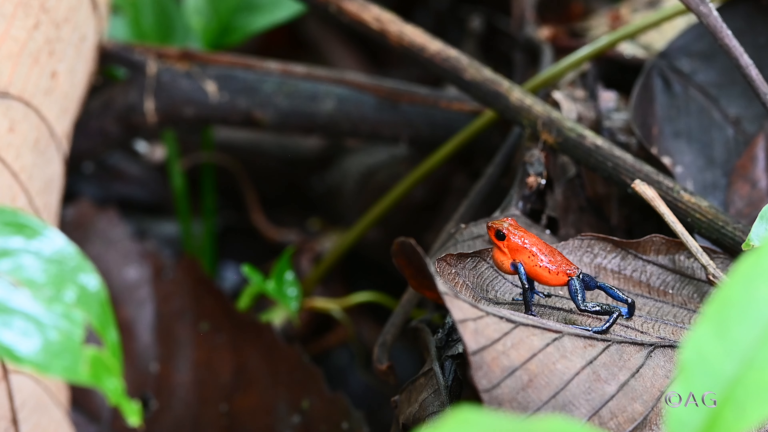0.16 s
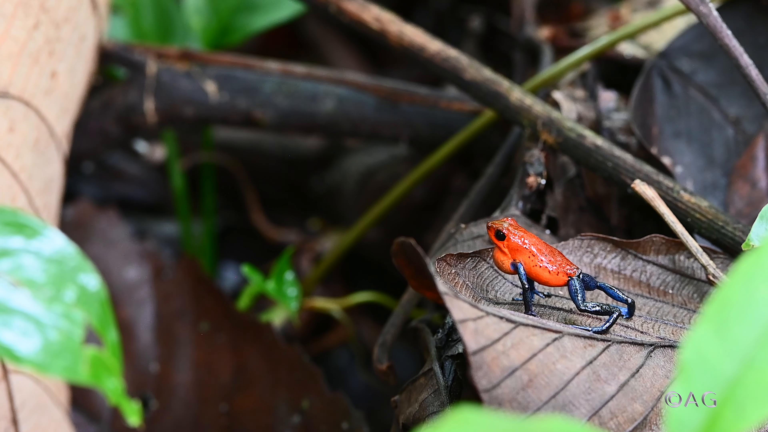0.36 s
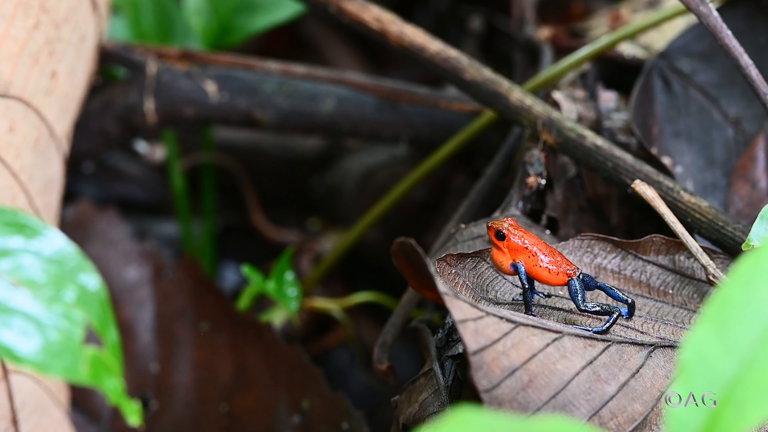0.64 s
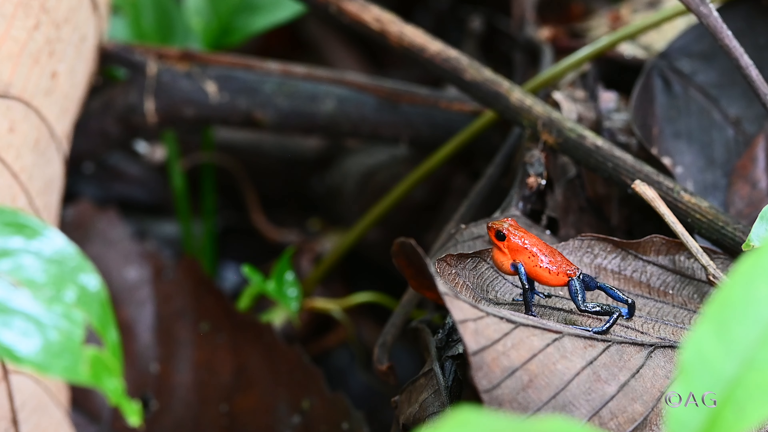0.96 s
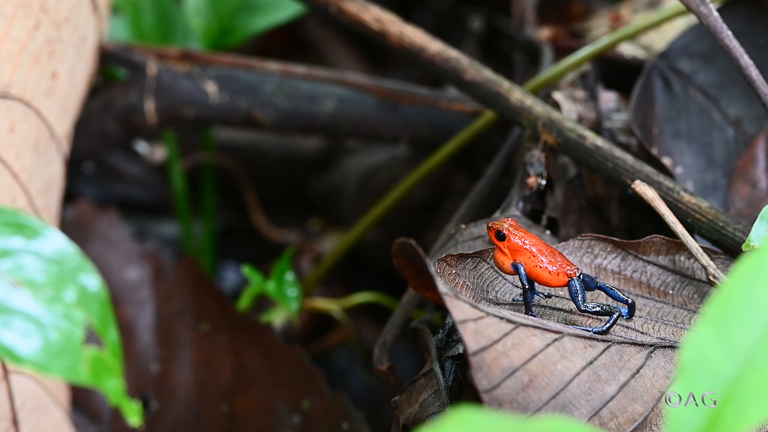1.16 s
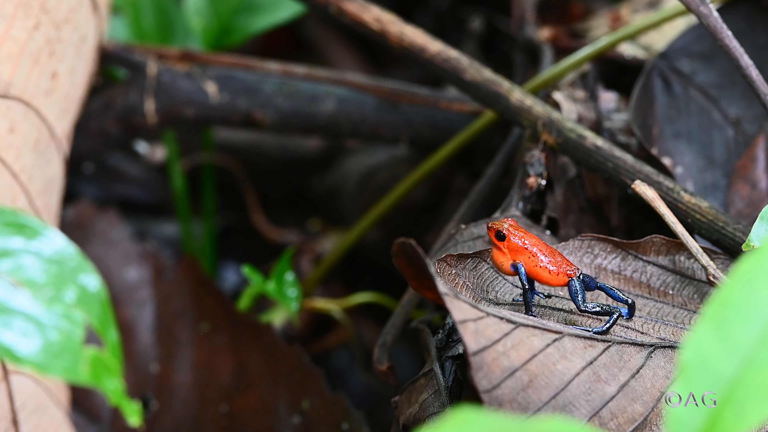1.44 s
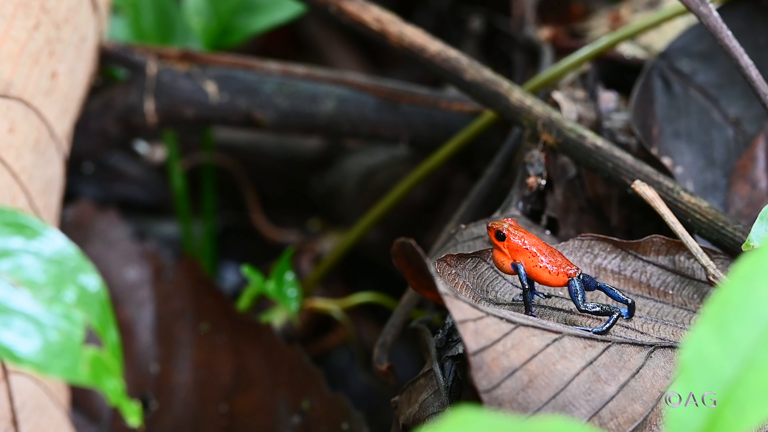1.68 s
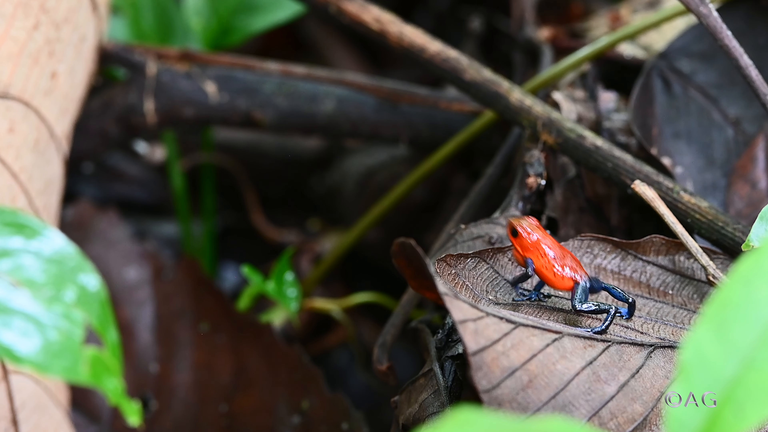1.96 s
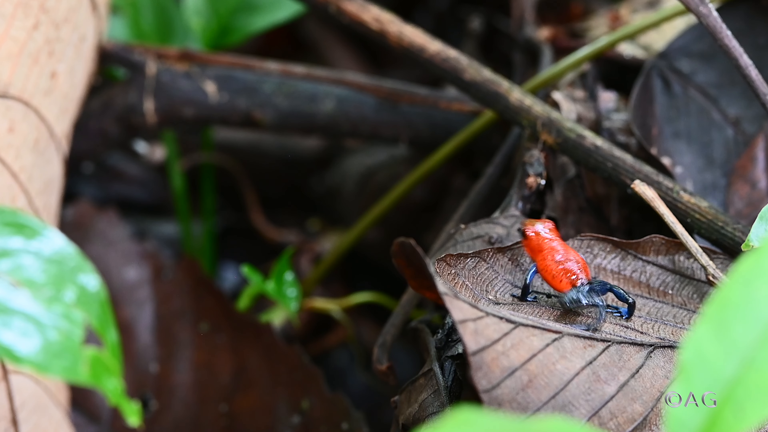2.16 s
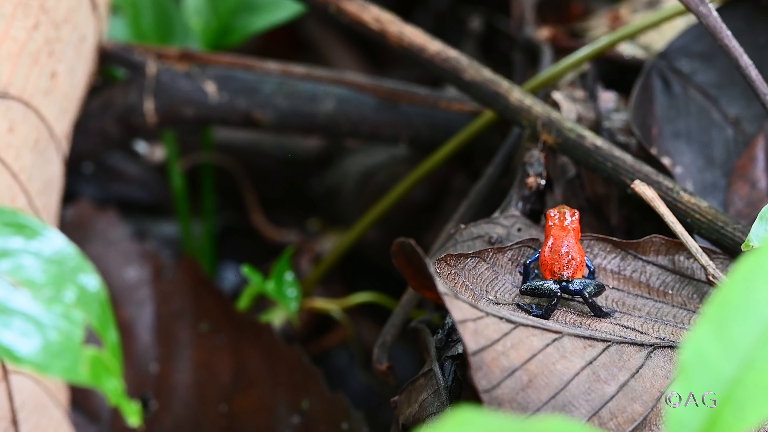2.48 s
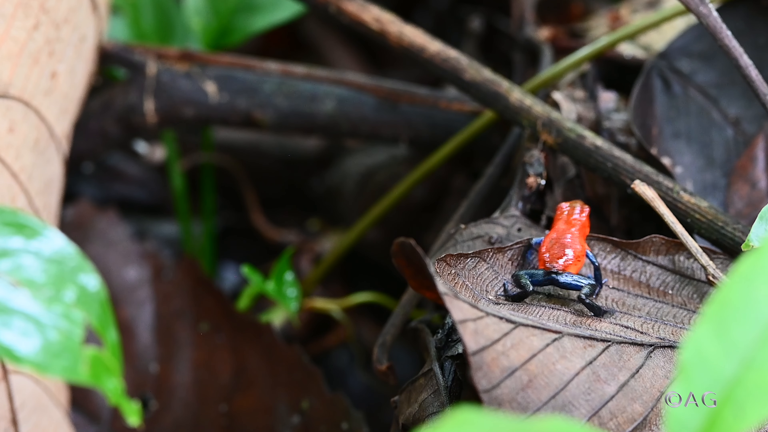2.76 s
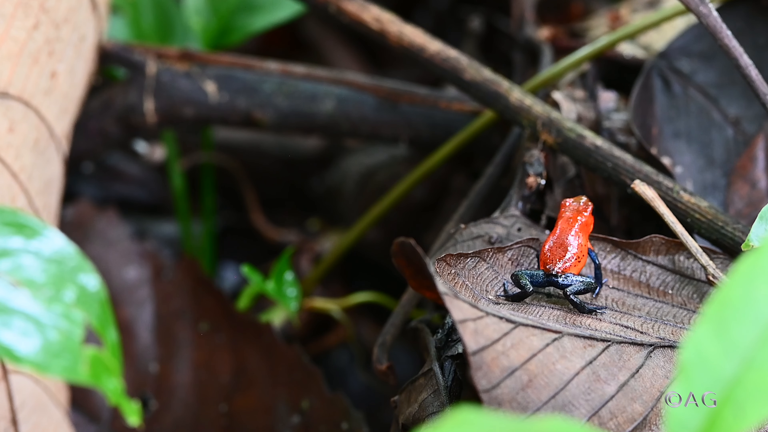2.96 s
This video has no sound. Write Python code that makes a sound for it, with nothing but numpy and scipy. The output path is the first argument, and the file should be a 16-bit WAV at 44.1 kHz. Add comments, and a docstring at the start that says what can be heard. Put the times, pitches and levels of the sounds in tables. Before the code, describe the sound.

Buzzy, clicking frog notes repeat quickly, two close callers overlapping, with faint distant frogs behind

```python
"""From the start a small frog calls buzzy notes in rainforest leaf litter, over far frogs, hiss, hums and a whine.
At about 0.5 s a third frog farther off gives three notes, and an insect chirps; at 0.75 s a higher frog joins in.
Just after the lower frog stops, past halfway, a leaf rustles; a low drone swells, and the insect chirps near 2.4 s.
Each frog note is a quickening run of clicks ringing the vocal sac, scattered by leaves and trees.
The other sounds are shaped noise, except the drone and the whine, which are sine tones."""
import sys
import numpy as np
from scipy import signal
from scipy.fft import rfft, irfft
from scipy.io import wavfile
from scipy.ndimage import uniform_filter1d, map_coordinates

SR = 44100
rng = np.random.default_rng(int(sys.argv[2]) if len(sys.argv) > 2 else 0)


def generate_wav(sig):
    """Save sig (samples, or channels by samples) to the path in sys.argv[1] as 16-bit PCM at SR."""
    pcm = np.round(np.clip(np.atleast_2d(sig).T, -1, 1) * 32767).astype(np.int16)
    wavfile.write(sys.argv[1], SR, pcm)


N = 137592
T, HZ = np.arange(N) / SR, np.fft.rfftfreq(N, 1 / SR)


def amp(db):
    """Turns decibels into a gain."""
    return 10 ** (np.asarray(db) / 20)


def unit(x):
    """Scales a sound to an average strength (rms) of 1."""
    return x / np.sqrt(np.mean(x ** 2) + 1e-20)


def read_curve(points, hz):
    """Reads a table between its points, with frequency on a log scale as the ear hears it."""
    f, value = np.transpose(points)
    return np.interp(np.log(hz + 1), np.log(f + 1), value)


def read_time(points):
    """Reads a (time, level) table at every sample and turns it into a gain."""
    return amp(np.interp(T, *np.transpose(points)))


def pan(db):
    """Left and right gains that make the left louder than the right by this many dB."""
    return amp([[db / 2], [-db / 2]])


def noise(gain, same):
    """Stereo noise with a given spectrum; 'same' says how alike left and right are (1 = identical)."""
    a, b = rfft(rng.standard_normal((2, N)))
    same = np.clip(same, -1, 1)
    right = same * a + np.sqrt(1 - same ** 2) * b
    return unit(irfft(np.array([a, right]) * gain, N))


def band(hz, width_hz):
    """Spectrum of one narrow resonance: a peak that falls away on both sides."""
    return 1 / (1 + ((HZ - hz) / (width_hz / 2)) ** 2 / 2)


def click(colour, size=2048):
    """One snap of the larynx as it rings out through the vocal sac."""
    hz = abs(np.fft.fftfreq(size, 1 / SR))
    log_gain = np.log(amp(read_curve(colour, hz)))
    # minimum phase: the energy comes as early as the colour allows
    spectrum = np.exp(np.conj(signal.hilbert(log_gain)))
    ring = np.fft.ifft(spectrum).real[:size // 8]
    return ring / np.linalg.norm(ring)


CLICK_SPREAD_DB, GAP_JITTER = 0.6, .025  # random spread of click strength, and of gaps as a share
SAC_RISE, SAC_WOBBLE = .025, 0.012  # pitch change over a note and spread per click, as shares


def notes(rows, course, colour):
    """Each note is a run of clicks that quickens and swells; the sac's pitch creeps up and wobbles."""
    out, ring = np.zeros(N), click(colour)
    sample = np.arange(len(ring))
    share, gap_ms, strength_db = np.transpose(course)
    for start, length, level_db in rows:
        t = 0
        for loud, late, wobble in rng.standard_normal((32, 3)):
            if t > length:
                break
            done = t / length
            at = round((start + t) * SR) - len(ring) // 16
            if 0 <= at < N - len(ring):
                # reading the ring faster raises its pitch
                speed = 1 + SAC_RISE * (done - .5) + SAC_WOBBLE * wobble
                snap = map_coordinates(ring, [sample * speed], order=3)
                click_db = np.interp(done, share, strength_db) + CLICK_SPREAD_DB * loud
                out[at:at + len(ring)] += snap * amp(level_db + click_db)
            t += np.interp(done, share, gap_ms) / 1000 * (1 + GAP_JITTER * late)
    return out


def ringing(x, hz, width_hz, db):
    """Adds the narrow note that lingers after each click."""
    b, a = signal.iirpeak(hz, hz / width_hz, fs=SR)
    return x + amp(db) * signal.lfilter(b, a, x)


# how long the forest's tail takes to fade: (frequency [Hz], time to fall 60 dB [s])
FOREST_FADE = [(2500, 0.18), (4200, .36), (6000, 0.16), (11000, 0.16)]


def forest(x, pan_db, echo_s, echo_db, litter_s, litter_db, tail_db):
    """Direct sound, one echo off a leaf, a quick scatter in the litter and the tail among the trees."""
    t = T[:SR // 2]
    litter, trees = rng.standard_normal((2, 2, len(t)))
    litter = litter * np.exp(-t / litter_s) * (t > .0006)
    # the tail fades at a different speed in each frequency band
    hz, age, z = signal.stft(trees, SR, nperseg=256)
    fade = amp(-60 * age / read_curve(FOREST_FADE, hz)[:, None])
    trees = signal.istft(z * fade, SR)[1][:, :len(t)]
    trees = trees * (1 - np.exp(-t / 0.0048))  # the tail builds up over a few milliseconds
    litter = amp(litter_db) * litter / np.linalg.norm(litter, axis=1, keepdims=True)
    trees = amp(tail_db) * trees / np.linalg.norm(trees, axis=1, keepdims=True)
    paths = litter + trees
    # direct sound and echo reach the right side one sample after the left
    paths[[0, 1], [0, 1]] += 1
    paths[[0, 1], round(echo_s * SR) + np.arange(2)] += amp(echo_db)
    return pan(pan_db) * signal.fftconvolve(x[None], paths, axes=1)[:, :N]


# notes of the lower frog: (start [s], length [s], relative level [dB])
LOW_NOTES = [(-.062, 0.063, 6), (.094, 0.065, 0), (.255, 0.069, 0.5), (.417, .066, 0), (.578, 0.065, -0.5),
             (.739, .07, 0), (.898, .068, -.5), (1.054, .069, -1), (1.218, .068, -1), (1.379, 0.063, -1),
             (1.533, .066, -1), (1.687, 0.067, -1.5)]
# course of its note: (share of the note's length [0-1], gap to the next click [ms], click strength [dB])
LOW_COURSE = [(0, 5, -11.5), (.2, 4.5, -5.5), (.45, 3.8, -1), (.65, 3.2, 0), (.9, 2.9, 1), (1, 2.8, -2.5)]
# colour of its click: (frequency [Hz], relative level [dB])
LOW_COLOUR = [(1500, -54), (2400, -27), (2750, -9.5), (3230, -2), (3650, -6.5), (4030, 0), (4600, -8),
              (5100, -9.5), (5400, -16.5), (5750, -15.5), (6100, -20), (6500, -16), (7100, -22.5),
              (8000, -32.5), (9500, -30.5), (10600, -24.5), (11600, -51), (15000, -55)]


def low_frog(level_db=-13.5):
    """The lower near frog: runs of clicks, with a narrow ring left in the air after each click."""
    calls = ringing(notes(LOW_NOTES, LOW_COURSE, LOW_COLOUR), hz=4015, width_hz=130, db=-4)
    return amp(level_db) * forest(calls, pan_db=0.2, echo_s=0.00119, echo_db=-14.5,
                                  litter_s=0.0096, litter_db=0.5, tail_db=-5)


# notes of the higher frog: (start [s], length [s], relative level [dB])
HIGH_NOTES = [(.737, 0.052, -6), (.886, 0.055, -6.5), (1.033, 0.055, 2.5), (1.1812, 0.059, 1),
              (1.331, 0.048, -1), (1.478, 0.055, -.5), (1.628, 0.05, 0.5), (1.774, 0.057, -2),
              (1.9204, 0.059, -2), (2.0658, 0.058, -.5), (2.217, 0.062, -1.5), (2.3693, .059, -0.5),
              (2.5195, 0.061, 0.5), (2.6699, 0.057, -1.5), (2.8199, 0.06, -1.5), (2.9725, 0.054, -0.5),
              (3.116, 0.046, -3)]
# course of its note, shared by the far frogs:
# (share of the note's length [0-1], gap to the next click [ms], click strength [dB])
HIGH_COURSE = [(0, 8.8, -6), (.15, 6.8, -4.5), (.27, 5.3, -2), (.38, 4.5, -.3), (.75, 4.25, .6),
               (.9, 3.2, -.3), (1, 2.7, -6)]
# colour of its click: (frequency [Hz], relative level [dB])
HIGH_COLOUR = [(1500, -57), (2600, -34), (3100, -11.5), (3750, -4), (4380, 3), (4750, -5.5), (5200, -19.5),
               (6000, -25), (7500, -31), (9500, -33), (12000, -51)]


def high_frog(level_db=-13.5):
    """The higher near frog: clicks that start slower and ring the sac at a higher pitch."""
    calls = notes(HIGH_NOTES, HIGH_COURSE, HIGH_COLOUR)
    return amp(level_db) * forest(calls, pan_db=1.2, echo_s=.0036, echo_db=-9,
                                  litter_s=0.0062, litter_db=-1.5, tail_db=-8)


# notes of a third frog farther off: (start [s], length [s], relative level [dB])
FAR_NOTES = [(.478, 0.041, -1.5), (.652, 0.061, 1), (.822, 0.072, 1)]
# colour of a far click, shared by the chorus: (frequency [Hz], relative level [dB])
FAR_COLOUR = [(2000, -59), (3200, -24), (3850, -12), (4190, 3), (4500, -11.5), (5200, -31), (8000, -43)]


def far_frog(level_db=-20.5):
    """The third frog behind them: the same run of clicks, with a narrower colour and more tail."""
    calls = notes(FAR_NOTES, HIGH_COURSE, FAR_COLOUR)
    return amp(level_db) * forest(calls, pan_db=5.0, echo_s=.002, echo_db=-12,
                                  litter_s=0.0054, litter_db=0.5, tail_db=-3)


def chorus(count=4, period_s=0.17, level_db=-34):
    """Distant frogs of the same kind, each at its own steady pace, blurred by the trees."""
    starts = np.arange(0, N / SR, period_s)
    rates, offsets = rng.uniform(0.99, 1.08, count), rng.uniform(-1.1, 0, count)
    calls = np.zeros(N)
    for rate, offset in zip(rates, offsets):
        rows = [(s * rate + offset * period_s, .06, 0) for s in starts]
        calls += notes(rows, HIGH_COURSE, FAR_COLOUR)
    return amp(level_db) * forest(calls / np.sqrt(count), pan_db=0, echo_s=.003, echo_db=-12,
                                  litter_s=.008, litter_db=0, tail_db=2)


# swell of a leaf rustle, before grain and panning: (time [s], level [dB])
RUSTLE = [(1.76, -64), (1.82, -54), (1.87, -47.5), (1.94, -52), (2.05, -59), (2.2, -90)]
# its colour: (frequency [Hz], relative level [dB])
RUSTLE_COLOUR = [(3000, -30), (5200, -0.5), (6800, 0), (8500, -0.5), (9100, -24), (14000, -32)]


def rustle(grain_db=1.5):
    """A brief, finely grained swish of a dry leaf: noise whose level flutters quickly."""
    grain = unit(uniform_filter1d(rng.standard_normal(N), size=120))
    swish = noise(amp(read_curve(RUSTLE_COLOUR, HZ)), 0.22)
    return pan(4.7) * read_time(RUSTLE) * amp(grain_db * grain) * swish


# insect chirps, before panning: (centre time [s], half length [s], level [dB])
CHIRPS = [(.607, 0.015, -50), (2.397, .011, -48.5), (2.446, 0.024, -57), (2.492, 0.016, -57)]


def insect(pan_db=8):
    """Thin short chirps from the left: narrow noise near 7.2 kHz in smooth bursts."""
    level = sum(amp(db) * np.exp(-((T - s) / half) ** 2) for s, half, db in CHIRPS)
    return pan(pan_db) * level * noise(band(hz=7200, width_hz=420), 0.43)


# colour of still air and distant insects: (frequency [Hz], relative level per Hz [dB])
AIR = [(20, -15), (42, -7), (55, 6), (75, 0), (100, 1.5), (180, -2.5), (320, -1), (550, -2.5), (790, -2.5),
       (920, 0.5), (1100, -4), (1800, -6), (2700, -8), (3500, -8), (4150, -3.5), (4700, -9), (5300, -11),
       (7000, -14.5), (9000, -18), (12000, -23), (14200, -25), (14900, -40)]
# how alike the two sides are: (frequency [Hz], left-right likeness [0-1])
AIR_SAME = [(60, 1), (180, 0.84), (350, 0.77), (700, 0.66), (1400, 0.6), (3000, 0.15), (6000, 0.1),
            (12000, 0.047)]
# which side is louder: (frequency [Hz], left minus right [dB])
AIR_BALANCE = [(60, 1), (380, -1.5), (900, 1), (1400, -1), (2400, 0), (4400, -2), (8000, 2), (14000, 1.5)]


def air(level_db=-45.5):
    """Low rumble and soft hiss: steady noise, nearly the same on both sides only in the bass."""
    tilt_db = np.array([[.5], [-.5]]) * read_curve(AIR_BALANCE, HZ)
    colour = amp(read_curve(AIR, HZ) + tilt_db)
    return amp(level_db) * noise(colour, read_curve(AIR_SAME, HZ))


# wavering hums: (frequency [Hz], width [Hz], level [dB])
HUMS = [(73, 3.1, -54), (54.8, 7.8, -58), (1086.7, 8.9, -64.5)]


def hums():
    """Wavering hums: noise so narrow that it sounds like an unsteady tone."""
    return sum(amp(db) * noise(band(hz, width), 1) for hz, width, db in HUMS)


# swell of the drone: (time [s], level [dB])
DRONE = [(0, -84), (.9, -61.5), (1.7, -58), (2.3, -55.5), (3.1, -56.5)]


def drone(hz=303.6, width_hz=17.24):
    """A low tone that creeps in, its pitch wandering at random around the middle."""
    waver = unit(uniform_filter1d(rng.standard_normal(N), size=700))
    turns = np.cumsum(hz + width_hz * waver) / SR
    return read_time(DRONE) * unit(np.sin(2 * np.pi * turns))


# peak level of the whine: (left [dB], right [dB])
WHINE_DB = (-51.7, -61)


def whine(hz=15709.8):
    """A thin steady sine tone; one side pushes while the other pulls."""
    return np.outer(amp(WHINE_DB) * [1, -1], np.sin(2 * np.pi * hz * T))


def scene():
    """Everything heard on the forest floor."""
    frogs = low_frog() + high_frog() + far_frog() + chorus()
    background = air() + hums() + drone() + whine()
    return frogs + rustle() + insect() + background


def record(dry):
    """Band limit: a steep filter takes away the sound above about 15.9 kHz."""
    low_pass = signal.firwin(801, 15900, window=("kaiser", 9), fs=SR)
    return signal.oaconvolve(dry, low_pass[None], "same")


dry = scene()
out = record(dry)
generate_wav(out)
```